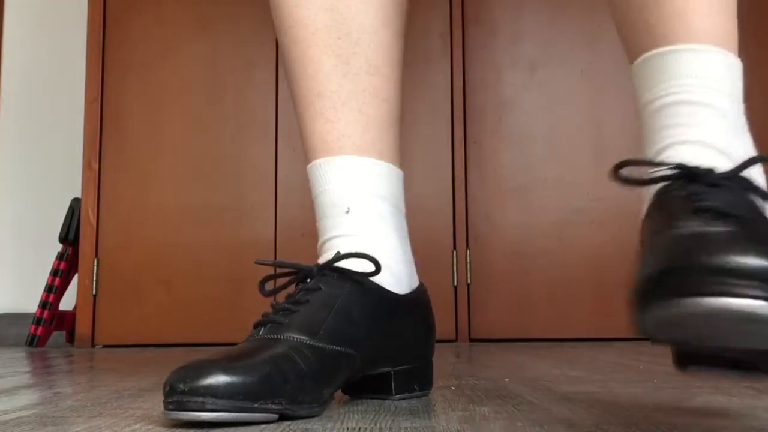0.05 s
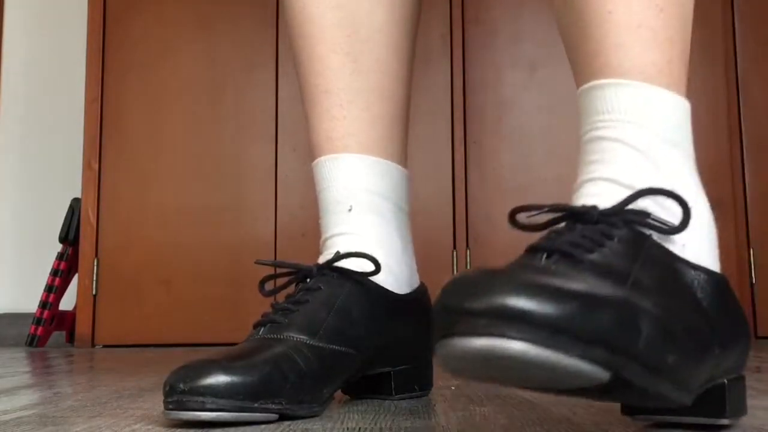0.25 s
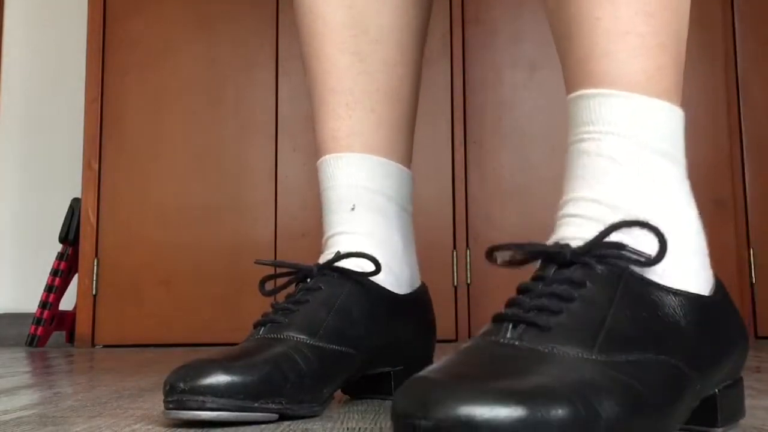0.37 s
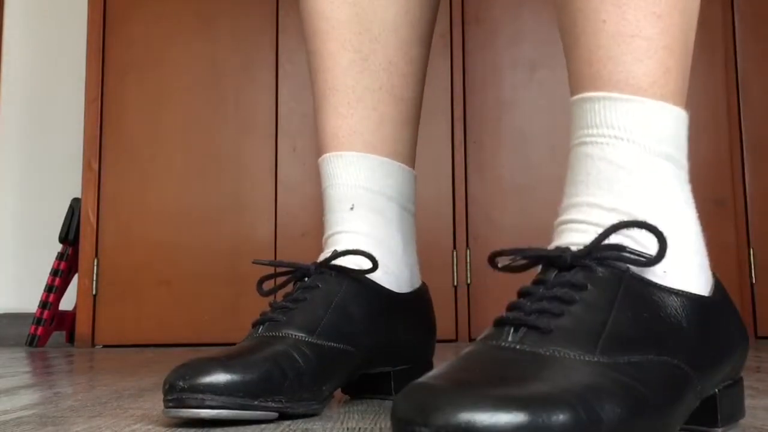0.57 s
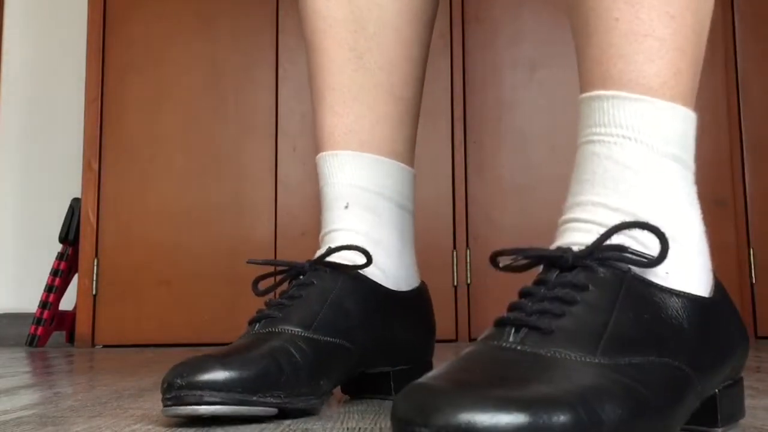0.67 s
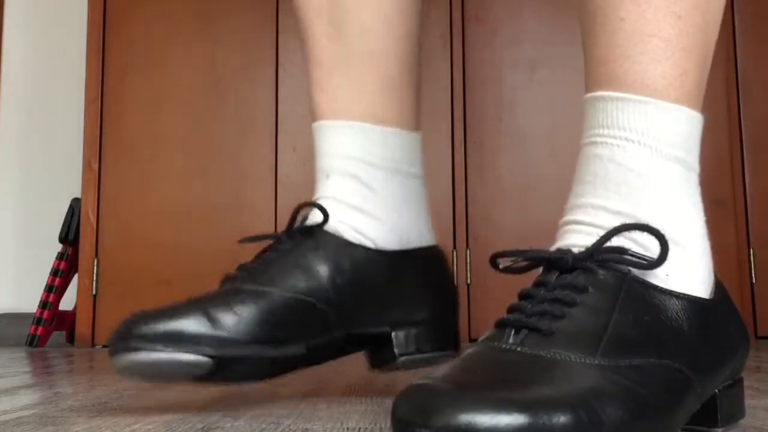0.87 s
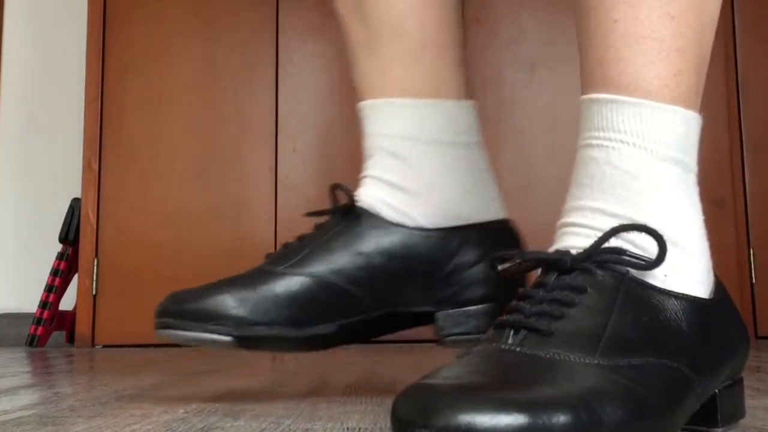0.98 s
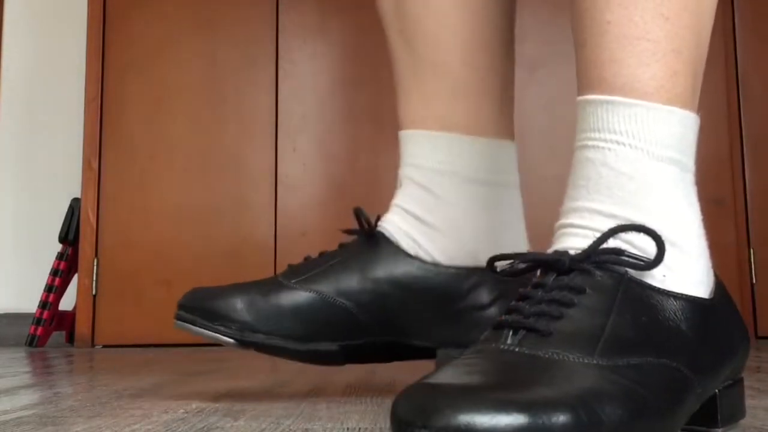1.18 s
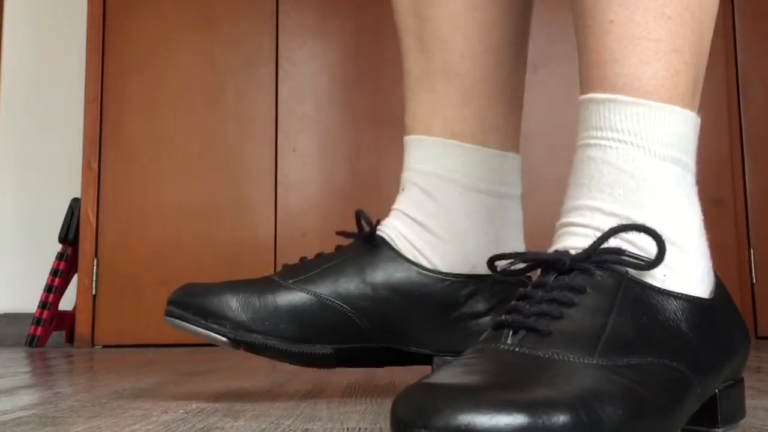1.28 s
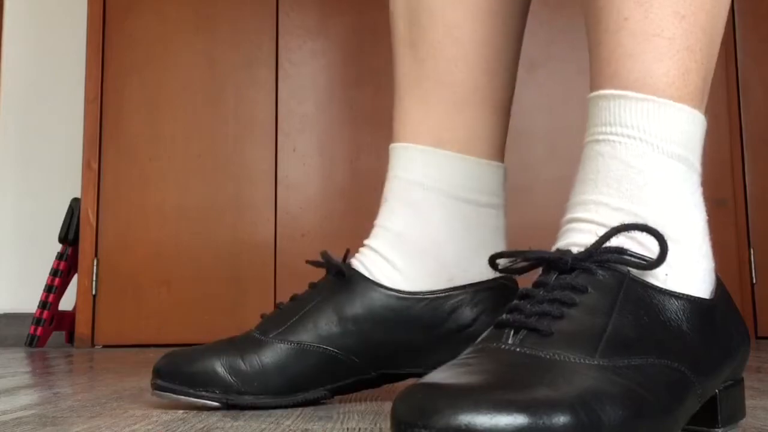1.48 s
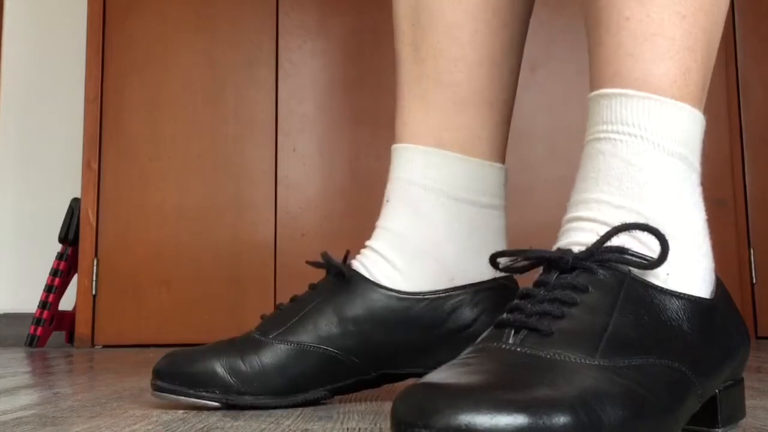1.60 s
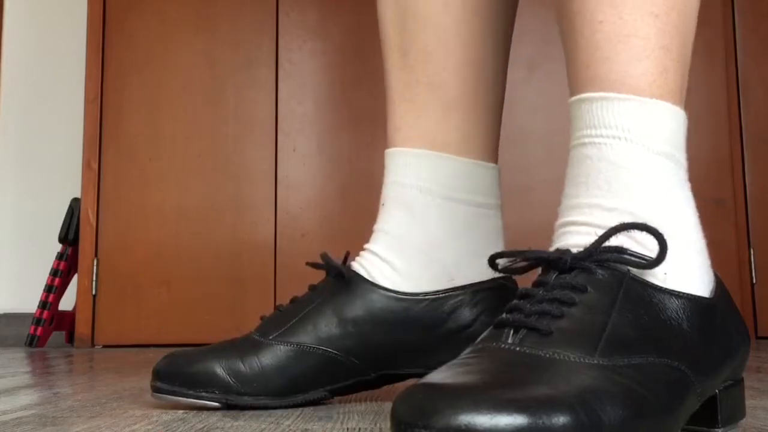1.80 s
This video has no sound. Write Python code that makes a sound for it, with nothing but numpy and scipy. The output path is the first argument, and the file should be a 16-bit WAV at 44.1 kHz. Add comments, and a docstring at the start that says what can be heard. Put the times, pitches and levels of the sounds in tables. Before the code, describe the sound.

Four crisp tap shoe strikes, heel then toe, twice over, knocking on a hard floor indoors

```python
"""Tap shoes on a hard floor, close to a low microphone in a quiet furnished room.
Each foot sets down heel then toe, with blows of the sole besides: damped modes make the plate click,
lower modes make the floor knock and boom, and decaying noise bands with standing waves ring as the room.
The recorder turns quiet tails down and adds a steady hiss of shaped noise."""
import sys
import numpy as np
from scipy import signal
from scipy.fft import rfft, irfft
from scipy.io import wavfile

SR = 44100
rng = np.random.default_rng(int(sys.argv[2]) if len(sys.argv) > 2 else 0)


def ratio_of_db(decibels):
    """Turn decibels (scalar or array-like) into linear amplitude factors; 0 dB maps to 1."""
    return 10 ** (np.asarray(decibels, float) / 20)


def transcribe(signal):
    """Save signal, clipped to [-1, 1], as a 16-bit WAV file at the path in sys.argv[1]."""
    frames = np.atleast_2d(signal).T
    limited = np.clip(frames, -1, 1)
    pcm = np.round(limited * 32767).astype(np.int16)
    wavfile.write(sys.argv[1], SR, pcm)


N = 81585

# damped modes of each plate pressed on the floor: pitch_hz, relative_level_db, rise_and_fall_s
NEAR_HEEL_MODES = [(884, 3, 0.00055), (1509, -5.5, 0.0011), (2685, -3.5, 0.00023), (3960, -24.5, 0.00047),
                   (6340, -22.5, 0.00028), (8050, -37, .0003), (11600, -45.5, .0004)]
NEAR_TOE_MODES = [(638, -7, 0.0016), (1300, 0.5, 0.00074), (2050, -1, 0.00069), (2880, -2.5, 0.00066),
                  (4060, -7.5, 0.00051), (5470, -31, 0.00068), (6120, -1, 0.00044), (7460, -10, 0.00024),
                  (11200, -28.5, .0003), (12300, -23, .00035), (13600, -23, .00035), (15000, -29.5, .0003),
                  (16200, -37, 0.00042)]
FAR_HEEL_MODES = [(864, -10, 0.0011), (1069, -6, 0.001), (1457, -4.5, 0.0014), (2710, -21, 0.00049),
                  (3720, -27.5, 0.00099), (4370, -28.5, 0.00047), (5780, -41, 0.00095),
                  (6370, -40.5, 0.0016), (7200, -45, 0.00054), (8400, -52.5, 0.00052)]
FAR_TOE_MODES = [(1212, -10.5, 0.0014), (1754, -4, .0008), (2840, -2.5, 0.00075), (3940, -19.5, 0.0013),
                 (5800, -32, .0006), (6740, -28.5, 0.0008), (8430, -32, 0.0012)]
SOLE_MODES = [(585, 1, .0004), (980, 1.5, 0.00047), (1860, -9, .0005), (3040, -30.5, 0.0003)]
# knock and low boom of the floor under every blow: pitch_hz, relative_level_db, rise_and_fall_s
FLOOR_KNOCK_MODES = [(145, -1.5, 0.0023), (246.9, 4, 0.00095), (433, -5.5, 0.0018)]
FLOOR_BOOM_MODES = [(65.4, -5.5, .008), (112, 0, 0.0023)]
# blows: start_s, plate_gain_db, knock_gain_db, boom_gain_db, room_gain_db
NEAR_HEEL_BLOWS = [(.2343, -14, -23.5, -37, -5)]
NEAR_TOE_BLOWS = [(0.4772, -16, -24, -21, -7.5)]
FAR_HEEL_BLOWS = [(1.3286, -14, -33, -44, -2.5)]
FAR_TOE_BLOWS = [(1.5483, -55, -53, -75.5, 5.5), (1.5714, -27, -41, -47, -4.5)]
SOLE_BLOWS = [(0.121, -61, -54.5, -73, 5), (0.8555, -38, -48, -60, -2.5), (.8964, -41, -62, -69, -6.5),
              (1.209, -63, -90.5, -72.5, 4), (1.5600, -32.5, -36, -47, -2.5)]
# paths from each part: mode_lag_cycles, shoe_echo_delay_s, shoe_echo_gain_db, room_tilt_db_per_octave
# (a negative lag starts modes part-way through; an echo delay outside 0 to 0.093 s gives no echo)
NEAR_HEEL_PATH = (1.04, .0012, -10, -1.65)
NEAR_TOE_PATH = (0.32, 0.4, -7.5, 0.5)
FAR_HEEL_PATH = (-0.45, 1, -15.5, 0.9)
FAR_TOE_PATH = (1.6, 1.5, -8, 1.06)
SOLE_PATH = (0.9, -1.2, -9.5, 2.55)
# time for the reflections to decay by 60 dB: pitch_hz, t60_s
ROOM_T60 = [(60, 1.17), (150, 0.43), (400, 0.83), (1000, 0.57), (2500, 0.595), (6000, .45), (12000, 0.3)]
# colour of the reflections: pitch_hz, relative_level_db
ROOM_COLOUR = [(60, -9), (140, -2), (300, -1), (550, 0.5), (800, 0.75), (1500, -1.03), (3000, -5.5),
               (6000, -8), (12000, -7)]
# standing waves of the room: pitch_hz, relative_level_db, t60_s
ROOM_MODES = [(139, -48, 0.29), (234, -53.5, 0.37), (435.7, -52, 0.43), (537.3, -50, 0.32),
              (609.6, -52.5, 0.53), (675, -46, 0.31), (721, -50, .4), (1039, -48, 0.24)]
# spectral density of the hiss: pitch_hz, relative_density_db
HISS_COLOUR = [(15, -27), (25, -2), (226, -2), (304, -7), (669, -9.5), (1430, -9.5), (1600, -11.5),
               (4990, -19), (6040, -19), (15200, -28), (16500, -17.5)]


def blows(modes, path, rows):
    """Superposition: each blow rings the plate, then the floor, and both fill the room from that spot."""
    lag_cycles, echo_s, echo_db, tilt_db = path
    floor_lag = int(0.00069 * SR)   # the floor answers 0.69 ms late
    mic_high_pass = signal.butter(3, 79.5, "high", fs=SR, output="sos")
    out = np.zeros(N + 2 * SR)
    plate = struck_modes(modes, lag_cycles)
    knock = np.roll(struck_modes(FLOOR_KNOCK_MODES), floor_lag, axis=1)
    boom = np.roll(struck_modes(FLOOR_BOOM_MODES), floor_lag, axis=1)
    echo = shoe_echo(plate.sum(axis=0), echo_s, echo_db)
    for start_s, plate_db, knock_db, boom_db, room_db in rows:
        hit = np.vstack([ratio_of_db(plate_db) * plate, ratio_of_db(knock_db) * knock, ratio_of_db(boom_db) * boom])
        reverberation = signal.fftconvolve(room_excitation(hit, tilt_db), room_response())
        heard = ratio_of_db(room_db) * reverberation[400:]   # takes up most of the pulse's 512-sample centring
        heard[:len(echo)] += hit.sum(axis=0) + ratio_of_db(plate_db) * echo
        first = int(start_s * SR)
        out[first:first + len(heard)] += signal.sosfilt(mic_high_pass, heard)
    return out[:N]


def struck_modes(modes, lag_cycles=0):
    """Modal synthesis: each row is a sine that swells to its peak at its time constant, then dies away
    smoothly."""
    out = []
    for k, (hz, db, tau) in enumerate(modes):
        # a lag counted in cycles holds low modes back longest
        t = np.maximum(np.arange(4096) / SR - lag_cycles / hz, 0)
        swell = (t / tau * np.exp(1 - t / tau)) ** 2
        polarity = (-1) ** k   # neighbouring modes start in opposite directions
        out.append(ratio_of_db(db) * swell * np.sin(2 * np.pi * hz * t) * polarity)
    return np.array(out)


def shoe_echo(click, delay_s, gain_db):
    """Reflection: the click returns off the shoe delayed, inverted and dulled."""
    steps = np.arange(len(click))
    echo = -ratio_of_db(gain_db) * np.interp(steps - delay_s * SR, steps, click)
    return signal.sosfilt(signal.butter(2, 5200, fs=SR, output="sos"), echo)


def room_excitation(rows, tilt_db):
    """Power summation: modes radiate in different directions, so the room gets their summed power as a pulse."""
    power = np.sum(np.abs(rfft(rows)) ** 2, axis=0)
    hz = np.arange(len(power)) * SR / rows.shape[1]
    octaves = np.log2(np.maximum(hz, 500) / 1000)   # the tilt is level below 500 Hz
    pulse = irfft(np.sqrt(power) * ratio_of_db(tilt_db * octaves))
    return np.roll(pulse, 512)[:1024] * np.hanning(1024)


def room_response():
    """Reverberant decay: third-octave noise bands die at their own rates, with standing waves on top."""
    first_echo_s, build_s = 0.0023, 0.0022
    t = np.arange(SR) / SR
    build_up = 1 - np.exp(-np.maximum(t - first_echo_s, 0) / build_s)
    edges = 40 * 2 ** (np.arange(27) / 3)
    white = rng.standard_normal((2, SR + 4000))
    out = 0
    for k, (low, high) in enumerate(zip(edges, edges[1:])):
        hz = np.sqrt(low * high)
        band_pass = signal.butter(2, [low, high], "band", fs=SR, output="sos")
        # neighbouring bands use independent noise; the filter's onset is skipped
        band = signal.sosfilt(band_pass, white[k % 2])[4000:]
        decay = build_up * ratio_of_db(-60 * t / at_hz(ROOM_T60, hz))
        out = out + ratio_of_db(at_hz(ROOM_COLOUR, hz)) * band * decay / np.sqrt(np.sum(decay ** 2))
    for hz, db, t60 in ROOM_MODES:
        wave = np.sin(2 * np.pi * (hz * t + rng.random()))
        out = out + ratio_of_db(db - 60 * t / t60) * build_up * wave
    return out


def at_hz(points, hz):
    """Interpolation on a log-frequency axis, holding the end values."""
    table = np.array(points)
    return np.interp(np.log(hz), np.log(table[:, 0]), table[:, 1])


def hiss():
    """Spectral shaping: white noise is coloured into the steady noise of room air and electronics."""
    hz = np.maximum(np.arange(N // 2 + 1) * SR / N, 1)
    x = irfft(rfft(rng.standard_normal(N)) * ratio_of_db(at_hz(HISS_COLOUR, hz)), N)
    return ratio_of_db(-69) * x / x.std()   # rms in dB re full scale


def scene():
    """Superposition of the heels, toes and soles of both shoes."""
    x = (blows(NEAR_HEEL_MODES, NEAR_HEEL_PATH, NEAR_HEEL_BLOWS)
         + blows(NEAR_TOE_MODES, NEAR_TOE_PATH, NEAR_TOE_BLOWS)
         + blows(FAR_HEEL_MODES, FAR_HEEL_PATH, FAR_HEEL_BLOWS)
         + blows(FAR_TOE_MODES, FAR_TOE_PATH, FAR_TOE_BLOWS)
         + blows(SOLE_MODES, SOLE_PATH, SOLE_BLOWS))
    return x[None]


def gate(x):
    """Downward expansion: the gain slides towards its shut value as the smoothed level passes the threshold."""
    threshold_db, width_db, shut_gain_db, smooth_s = -64.5, 2.5, -12.5, 0.0034
    r = np.exp(-1 / (smooth_s * SR))
    power = signal.filtfilt([1 - r], [1, -r], x ** 2)   # smoothed forwards and backwards
    level_db = 10 * np.log10(power + 1e-14)
    shut = 1 / (1 + np.exp(np.clip((level_db - threshold_db) / width_db, -30, 30)))
    return x * ratio_of_db(shut_gain_db * shut)


def top_cut(x):
    """Nothing passes above the cut-off."""
    return signal.sosfilt(signal.butter(12, 16720, fs=SR, output="sos"), x)


def record(dry):
    """Signal chain: the gate acts before the hiss is added, so the hiss stays steady beneath."""
    mix = gate(dry) + hiss()
    return top_cut(mix)


dry = scene()
out = record(dry)
transcribe(out)
```